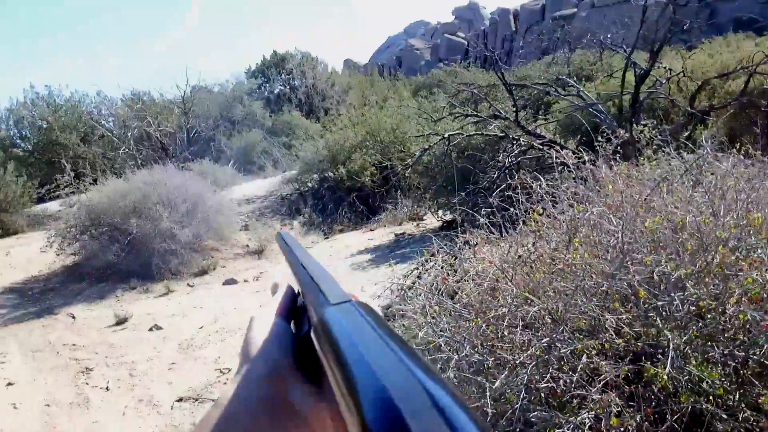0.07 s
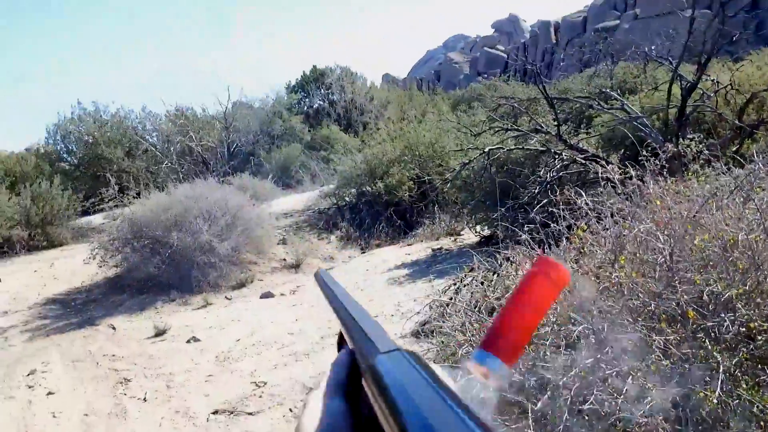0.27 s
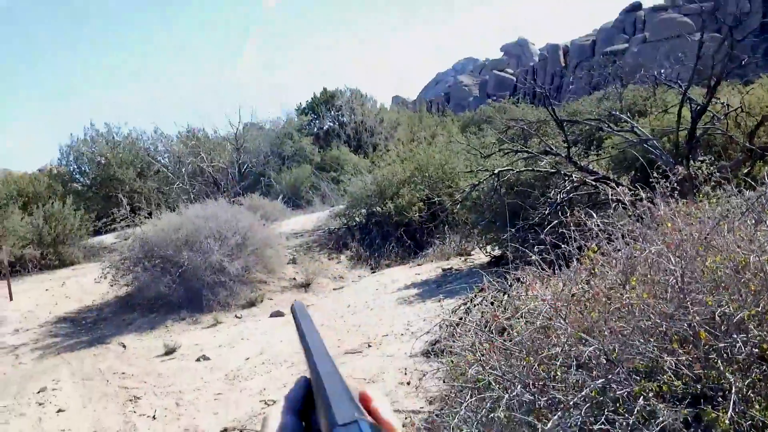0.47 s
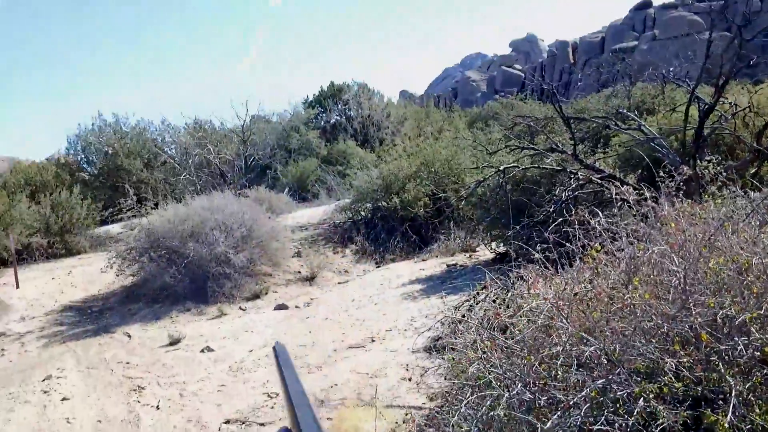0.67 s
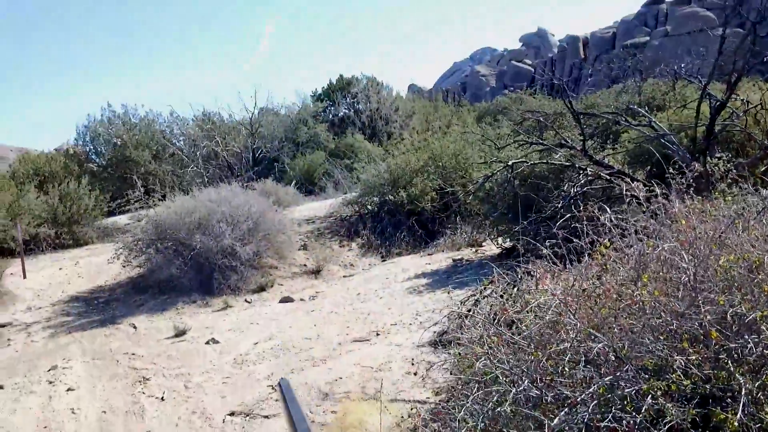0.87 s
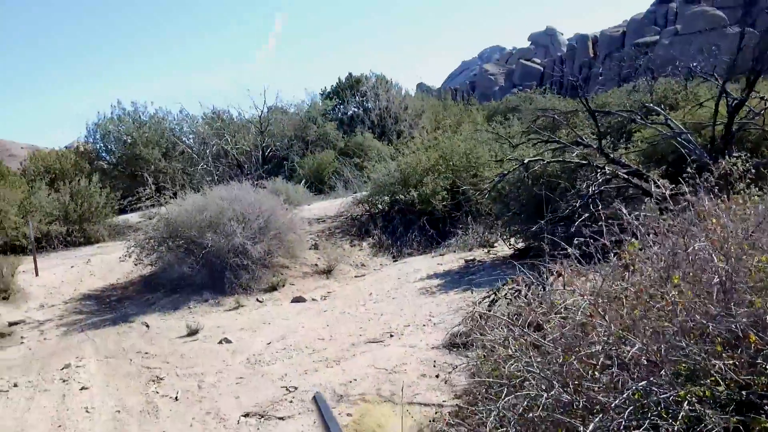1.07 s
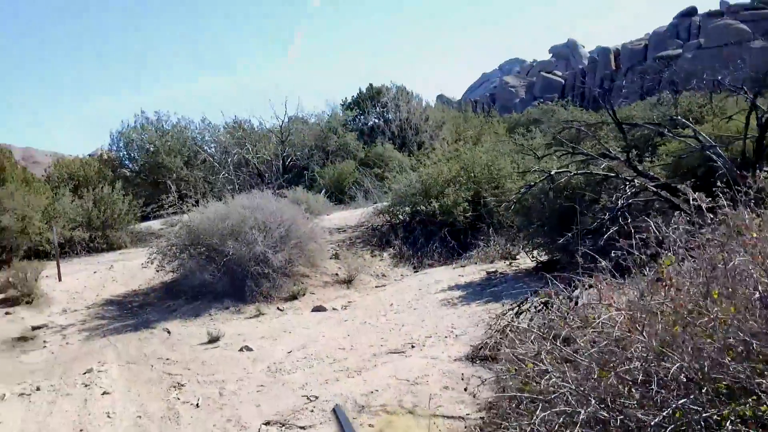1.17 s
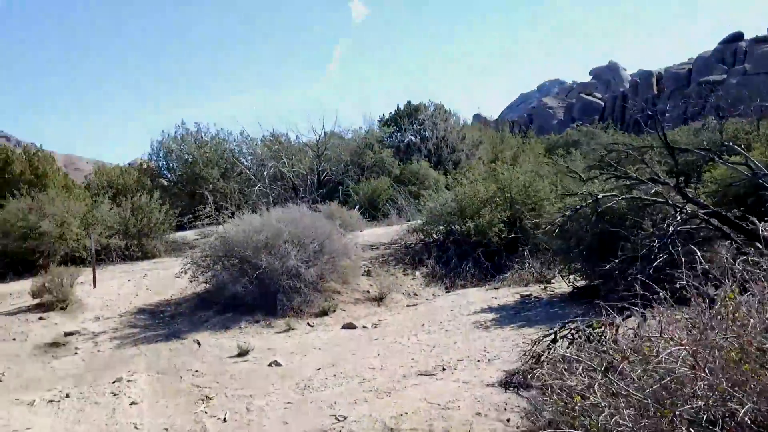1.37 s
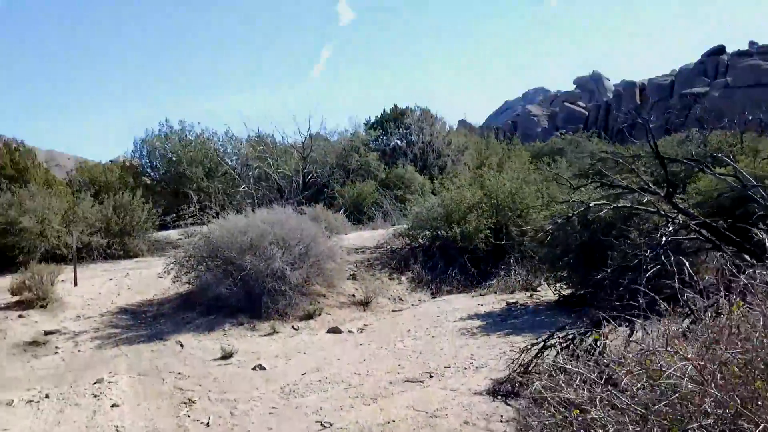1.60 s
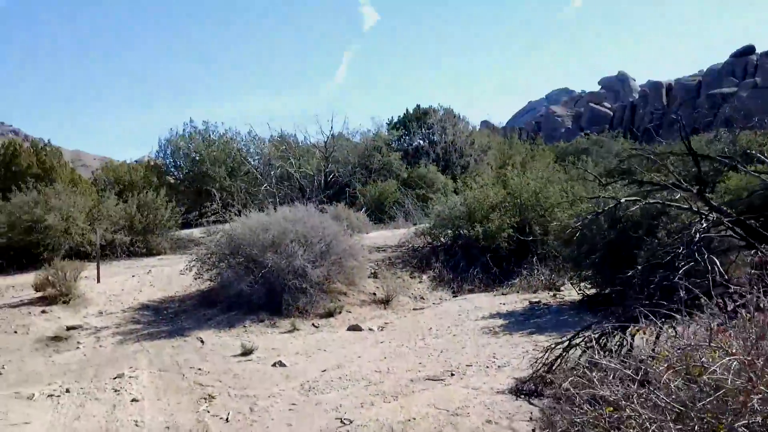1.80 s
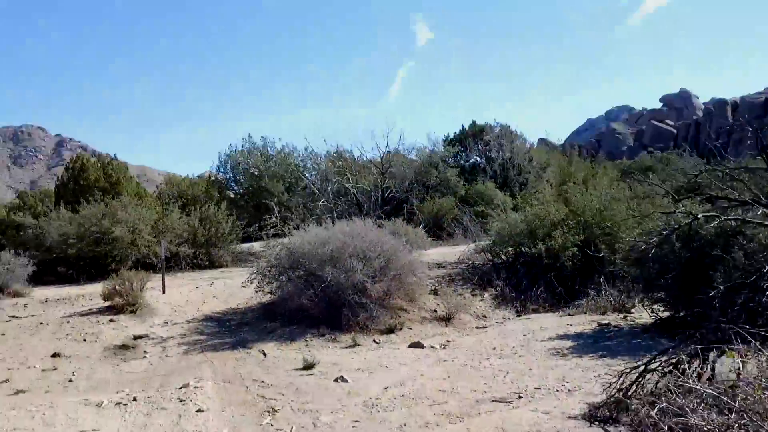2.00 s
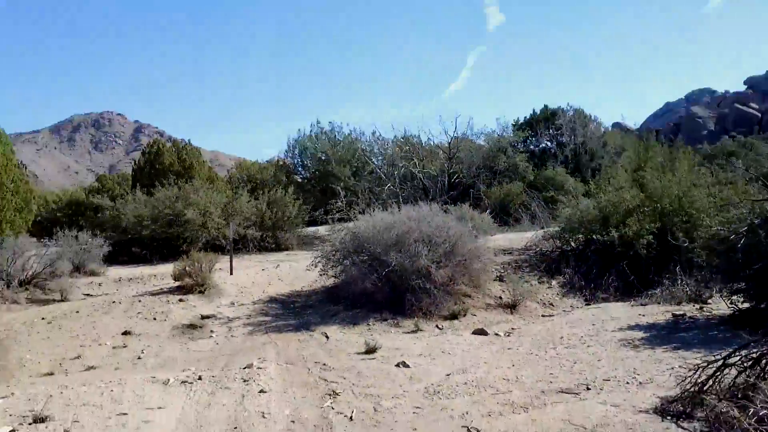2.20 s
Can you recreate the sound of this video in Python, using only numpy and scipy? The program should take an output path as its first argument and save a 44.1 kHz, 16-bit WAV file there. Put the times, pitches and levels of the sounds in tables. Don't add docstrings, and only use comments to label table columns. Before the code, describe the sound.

Loud, slightly clipped metal clacks of a shotgun slide pulled back and slammed forward, close to a head-worn microphone outdoors; then a lone bolt click, light rattles and knocks over fading shot echoes and soft breeze.

```python
import sys
import numpy as np
from scipy import signal
from scipy.fft import rfft, irfft, next_fast_len
from scipy.io import wavfile
from scipy.ndimage import map_coordinates

SR = 44100
rng = np.random.default_rng(int(sys.argv[2]) if len(sys.argv) > 2 else 0)


def level_to_linear(level):
    exponent = np.asarray(level, float) / 20
    return 10 ** exponent


def dump(signal):
    limited = np.clip(np.atleast_2d(signal).T, -1, 1)
    pcm = np.round(limited * 32767).astype(np.int16)
    wavfile.write(sys.argv[1], SR, pcm)


N = 99225
T = np.arange(N) / SR


def along(points, hz):
    f, db = np.transpose(points)
    inside = np.interp(np.log(hz + 1), np.log(f + 1), db)
    return inside - 40 * np.log2(np.maximum(hz / f[-1], 1))


def shaped(x, points):
    m = next_fast_len(len(x) + 4096)
    gain = level_to_linear(along(points, np.fft.rfftfreq(m, 1 / SR)))
    return irfft(rfft(x, m) * gain, m)[:len(x)]


def unit(x):
    return x / np.sqrt(np.mean(x ** 2) + 1e-20)


def noise(tone, count=N):
    return unit(shaped(rng.standard_normal(count), tone))


def level(rows):
    s, db = np.transpose(rows)
    return level_to_linear(np.interp(T, s, db))


def wobble(rate):
    knots = rng.standard_normal(int(N * rate / SR) + 4)
    return map_coordinates(knots, [T * rate])


def roll(tone, rate, lumpy_db):
    lumps = level_to_linear(lumpy_db * wobble(rate))
    return unit(shaped(rng.standard_normal(N) * lumps, tone))


def add(out, s, x):
    part = out[max(round(s * SR), 0):][:len(x)]
    part += x[:len(part)]


def ring(modes, t60, t):
    total = 0
    for hz, db in modes:
        gain = level_to_linear(db + 4 * rng.normal())
        pitch = hz * (1 + 0.022 * rng.normal())
        total = total + gain * np.sin(2 * np.pi * pitch * t)
    return level_to_linear(-60 * t / t60) * total


def pings(rows, t60, spread, count):
    out, t = np.zeros(N), np.arange(1500) / SR
    envelope = level_to_linear(-60 * t / t60) * (1 - np.exp(-t / 0.00077))
    for s, db, hz in rows:
        pitches = hz * np.exp(spread * np.append(0, rng.standard_normal(count)))[:, None]
        gains = np.append(1, 0.5 * rng.random(count))[:, None]
        x = (gains * np.sin(2 * np.pi * pitches * t)).sum(0) * envelope
        add(out, s, level_to_linear(db) * x / np.abs(x).max())
    return out


# start in seconds, level in dB, chatter t60 in seconds, treble in dB.
SLIDE_BACK = [(0.205, -18, 0.036, -6), (0.2063, -8, 0.025, -10.5), (0.2133, -5.5, 0.041, -2.5),
              (0.2239, -16.5, 0.064, -1.5), (0.2292, -11.5, 0.033, -8.5), (0.2464, -11, 0.095, -13.5),
              (.252, -4, 0.039, -3.5), (0.2588, -3.5, 0.049, -6.5), (.266, -11, 0.033, 6.5),
              (0.2697, -3.5, 0.059, 4.5), (0.2752, 6, 0.035, 5), (0.2785, 1, 0.016, -5.5),
              (0.2825, -5.5, 0.03, 0.5), (.288, -16, 0.031, -2.5), (0.298, -21, 0.053, 4),
              (0.3126, -8.5, 0.046, -6), (.319, -19, 0.056, 7.5)]
# start in seconds, level in dB, chatter t60 in seconds, treble in dB.
SLIDE_FORWARD = [(0.3596, -22.5, 0.026, 1), (0.3661, -17.5, 0.033, -9), (.375, -20.5, 0.12, -2),
                 (0.3798, -22.5, 0.019, 4), (0.386, -18.5, 0.023, -13), (.389, -17.5, 0.049, 0),
                 (0.402, -22.5, 0.07, -3), (.409, -11.5, .06, -2), (.414, -14, 0.041, -3.5),
                 (0.4194, -20, 0.023, 0), (0.4275, -20.5, 0.04, -5), (0.4402, 2.5, 0.038, 7),
                 (0.4465, -3, 0.028, -2), (0.4529, 6, 0.023, -3.5), (0.477, -37, 0.063, -1),
                 (0.4919, -29, 0.071, 11.5), (0.5, -37.5, 0.028, -9)]
# frequency in Hz, level in dB.
BODY_MODES = [(800, -6), (1260, -6.5), (1620, -6.5), (2270, 1), (3020, 3.5), (3300, -7), (4200, -2.5)]
# frequency in Hz, level in dB.
STEEL_MODES = [(5200, -10.5), (5700, -11.5), (6200, 0), (6670, 8.5), (7300, 0.5), (7830, -0.5), (9600, -16)]
# frequency in Hz, level in dB.
CRACK_TONE = [(60, -29.5), (200, -25.5), (600, -9.5), (1330, 3.5), (3400, -7.5), (6500, -1.5),
              (9000, -21.5), (11000, -31), (15000, -59)]


def slide_action():
    out, t = np.zeros(N), np.arange(4000) / SR
    slip_chance = 1400 / SR
    for s, db, t60, treble_db in SLIDE_BACK + SLIDE_FORWARD:
        rise_s = 0.00035 * t60 / 0.086
        fade = level_to_linear(-60 * t / t60) * (1 - np.exp(-(t + 1 / SR) / rise_s))
        fade /= fade.max()
        slips = rng.standard_normal(len(t))
        slips *= np.clip(3 * (slip_chance - rng.random(len(t))) / slip_chance, 0.12, 1)
        slips[9] = 1
        tone = ring(BODY_MODES, 0.013, t)
        tone += level_to_linear(treble_db) * ring(STEEL_MODES, 0.007, t)
        tone += ring([(3100, -12.5)], 0.047, t)
        clack = signal.fftconvolve(slips * fade, tone)[:len(t)]
        crack = noise(CRACK_TONE, len(t)) * fade
        add(out, s, level_to_linear(db) * (clack / np.abs(clack).max() + level_to_linear(-9.5) * crack))
    return out


# start in seconds, peak in dB, pitch in Hz.
ACCENT_HITS = [(.2075, -22.5, 930), (.2143, -13, 790), (.2143, -11.5, 7170), (.222, -21.5, 800),
               (.229, -21.5, 960), (.237, -21, 680), (.2465, -11.5, 905), (.2515, -7.5, 1420),
               (1.1562, -43, 3720), (.2695, -7.5, 4270), (.27, -7, 7570), (.27, -15, 2000),
               (.2765, -4, 1282), (.278, -5, 6055), (.2825, -8.5, 4420), (.2885, -14, 1250),
               (.298, -20.5, 4300), (.3125, -22, 993), (.314, -15.5, 5090), (.322, -21.5, 1298),
               (.361, -26, 900), (.367, -24, 4100), (2.2174, -50, 4270), (.3797, -18.5, 6357),
               (.387, -25.5, 3030), (.403, -28, 3000), (.408, -24, 800), (.412, -19, 2992),
               (.4155, -20.5, 743.5), (.42, -23, 4338), (.4275, -22.5, 6530), (.4295, -26.5, 3100),
               (.4412, -4, 1247), (.4415, -0.5, 6670), (.4465, -7, 4090), (.4465, -12, 560),
               (.453, -10.5, 4150), (2.2174, -49, 2000)]


def accents():
    return pings(ACCENT_HITS, t60=0.012, spread=0.045, count=3)


# start in seconds, peak in dB, pitch in Hz.
LOOSE_TICKS = [(0.3133, -17.5, 6870), (0.3845, -24, 5950), (0.3851, -16.5, 6800), (0.9025, -40, 5850),
               (1.026, -38.5, 6340), (1.032, -40.5, 6800), (1.1248, -44.5, 6570), (1.2135, -42.5, 6720),
               (1.226, -50, 6790), (1.234, -44, 6400), (1.2467, -45.5, 6490), (1.3229, -42, 6470),
               (1.3304, -46, 6640), (1.3392, -52, 5780), (1.5387, -47.5, 6610), (1.6061, -46, 6560),
               (1.6534, -51, 5200), (1.7393, -49, 6470), (1.8442, -48, 5530), (1.9292, -43, 5700),
               (2.066, -48.5, 6090), (2.1092, -49, 6860), (2.114, -47, 6300), (2.244, -51, 4000)]


def ticks():
    return level_to_linear(2) * pings(LOOSE_TICKS, t60=0.007, spread=0.14, count=8)


# start in seconds, peak in dB, pitch in Hz.
DULL_KNOCKS = [(.2605, -5, 3040), (.3135, -11, 3156), (1.026, -38.5, 1480), (1.1255, -44, 1586),
               (1.126, -47, 3780), (1.198, -47, 906), (1.203, -37, 1126), (1.2068, -32.5, 495),
               (1.2072, -37, 1420), (1.235, -50, 3200), (1.43, -43, 1300), (1.985, -47.5, 1400),
               (2.025, -38, 909), (2.031, -42, 1196), (2.043, -43, 1293), (2.057, -40.5, 906),
               (2.07, -44, 1105), (2.085, -43.5, 900), (2.114, -45, 1340), (2.156, -39, 1010),
               (2.161, -48.5, 1400), (2.172, -55, 1230)]


def knocks():
    return pings(DULL_KNOCKS, t60=0.012, spread=0.25, count=6)


# start in seconds, level in dB, brightness in dB per octave, body in dB.
BOLT_BLOWS = [
    (0.8946, -7, 2.5, -5),
    (1.1543, -30, 9, -25),
    (1.1572, -35, -0.5, -22),
    (2.217, -36, -6, 4),
]
# frequency in Hz, level in dB, t60 in seconds.
BOLT_STEEL = [(3700, -14, .006), (5630, 0, .007), (6860, -4, .006), (8100, -12, .005), (9700, -13, .005),
              (12300, -26, .005)]
# frequency in Hz, level in dB, t60 in seconds.
BEHIND_BOLT = [(800, 7, 0.0039), (1270, -3, 0.016), (2000, -6.5, 0.01), (3200, -6.5, 0.0085),
               (4270, -18, 0.0078)]


def bolt():
    out, t = np.zeros(N), np.arange(1500) / SR
    for s, db, bright_db, body_db in BOLT_BLOWS:
        x = np.zeros(len(t))
        for hz, mode_db, t60 in BOLT_STEEL:
            tilt_db = bright_db * np.log2(hz / BOLT_STEEL[1][0])
            x += level_to_linear(mode_db + tilt_db - 60 * t / t60) * np.sin(2 * np.pi * hz * t)
        for hz, mode_db, t60 in BEHIND_BOLT:
            x += level_to_linear(mode_db + body_db - 60 * t / t60) * np.sin(2 * np.pi * hz * t)
        add(out, s, level_to_linear(db - 6) * x * (1 - np.exp(-t / 0.0002)))
    return out


# time in seconds, side level in dB.
SHELL_THROWN = [(.236, -100), (.242, -42), (.261, -36), (.267, -25), (.285, -26), (.3, -40), (.322, -42),
                (.33, -100)]
# time in seconds, side level in dB.
SHELL_FED = [(.35, -100), (.36, -48), (.385, -43), (.412, -52), (.422, -100)]
# frequency in Hz, level in dB.
BREECH_TONE = [(100, -12), (1300, 0), (7000, -2), (14000, -34)]


def breech_side():
    return level(SHELL_THROWN + SHELL_FED) * noise(BREECH_TONE)


def ground(gun):
    t = np.arange(6000) / SR
    tail = rng.standard_normal(len(t)) * level_to_linear(-60 * t / 0.075)
    tail /= np.linalg.norm(tail)
    return level_to_linear(-26) * signal.fftconvolve(gun, tail)[:N]


# start in seconds, peak in dB, pitch in Hz.
ROCK_SLAPS = [(0, -21.5, 620), (.031, -23.5, 1384), (.039, -21, 716), (.044, -18.5, 730), (.084, -22, 660),
              (.0905, -15.5, 520), (.121, -20.5, 770), (.1485, -18, 770), (.157, -29, 1010),
              (.683, -42.5, 890), (.72, -30, 626), (.8665, -34, 593)]
# time in seconds, level in dB.
NEAR_ROLL = [(0, -34.5), (.06, -32.5), (.16, -34.5), (.2, -41.5), (.45, -44.5), (.52, -54), (.66, -51.5),
             (.8, -65)]
# time in seconds, level in dB.
FAR_ROLL = [(.6, -67), (.68, -48), (.75, -40), (.87, -36.5), (1.1, -42), (1.16, -48), (1.26, -57),
            (1.5, -69)]
# frequency in Hz, level in dB.
NEAR_COLOUR = [(35, -42), (60, -8.5), (144, -3), (292, -22), (510, -5), (1490, -13), (6800, -32),
               (8980, -44), (10000, -75.5), (13000, -106), (22000, -120)]
# frequency in Hz, level in dB.
FAR_COLOUR = [(120, -32.5), (300, -4.5), (520, 3), (800, -8), (1000, -17), (3000, -47)]
# frequency in Hz, level in dB.
FAR_EDGE_COLOUR = [(700, -29), (1100, -7.5), (1500, 1.5), (2200, -11.5), (3200, -11.5), (4000, -28.5),
                   (8000, -45)]


def echoes():
    near = level(NEAR_ROLL) * roll(NEAR_COLOUR, rate=96, lumpy_db=3.5)
    edge_fade = level_to_linear(-11 - 13 * (T - FAR_ROLL[2][0]))
    edge = edge_fade * roll(FAR_EDGE_COLOUR, rate=29, lumpy_db=1.5)
    cliff = roll(FAR_COLOUR, rate=83, lumpy_db=2.5) + edge
    far = level(FAR_ROLL + [(2.14, -83)]) * cliff
    return near + far + pings(ROCK_SLAPS, t60=0.016, spread=0.344, count=3)


# time in seconds, level in dB.
CLOTH_STIR = [(1.801, -71), (1.921, -59), (2.059, -60), (2.25, -62)]
# frequency in Hz, level in dB.
CLOTH_TONE = [(150, -31.5), (400, 1.5), (900, -7), (1500, 0), (2000, -16), (5000, -21.5)]


def cloth():
    return level([(1.36, -100)] + CLOTH_STIR) * roll(CLOTH_TONE, rate=160, lumpy_db=2)


# time in seconds, level in dB.
BREEZE_LEVEL = [(0, -49), (.2, -59), (.55, -47), (.76, -40.5), (1, -44), (1.18, -41.5), (1.3, -44),
                (1.5, -48.5), (1.57, -45), (1.65, -49.5), (1.88, -47.5), (2.07, -45), (2.25, -45)]
# frequency in Hz, level in dB.
BREEZE_TONE = [(7.1, -30.5), (12, -1.5), (33, -4), (135, -17.5), (210, -21), (400, -28.5), (520, -55),
               (880, -120)]


def breeze():
    return level(BREEZE_LEVEL) * roll(BREEZE_TONE, rate=55, lumpy_db=0.5)


# time in seconds, level in dB.
INSECT_LEVEL = [(1.1, -87), (1.649, -83), (1.75, -73.5), (2.25, -77)]
# frequency in Hz, level in dB.
INSECT_COLOUR = [(10500, -30), (11800, -6.5), (12500, -0.5), (13200, -13.5), (14500, -29)]


def insects():
    return level([(0.9, -120)] + INSECT_LEVEL) * noise(INSECT_COLOUR)


# time in seconds, level in dB.
AIR_LEVEL = [(.5, -60.5), (1.1, -60.5), (1.7, -60), (2.25, -58.5)]
# frequency in Hz, level in dB.
AIR_TONE = [(88, -30.5), (150, -8.5), (491, -10.5), (595, -10.5), (807, -11.5), (2640, -20), (6620, -20),
            (10000, -28), (11000, -35.5), (12400, -37.5), (14500, -53.5)]


def desert_air():
    return level(AIR_LEVEL) * roll(AIR_TONE, rate=12, lumpy_db=0.4)


def scene():
    gun = slide_action() + accents() + ticks() + knocks()
    mic_top = signal.butter(N=8, Wn=9900, fs=SR, output="sos")
    gun = signal.sosfilt(mic_top, gun) + bolt()
    background = cloth() + breeze() + insects() + desert_air()
    mid = gun + ground(gun) + echoes() + background
    side = breech_side()
    return np.array([mid + side, mid - side])


def roll_off(x):
    return signal.sosfilt(signal.butter(12, 14710, fs=SR, output="sos"), x)


def record(dry):
    top, hardness = 1.02, 8
    clipped = dry / (1 + np.abs(dry / top) ** hardness) ** (1 / hardness)
    smoother = signal.butter(N=4, Wn=10500, fs=SR, output="sos")
    mix = dry + signal.sosfiltfilt(smoother, clipped - dry)
    return roll_off(mix)


dry = scene()
out = record(dry)
dump(out)
```